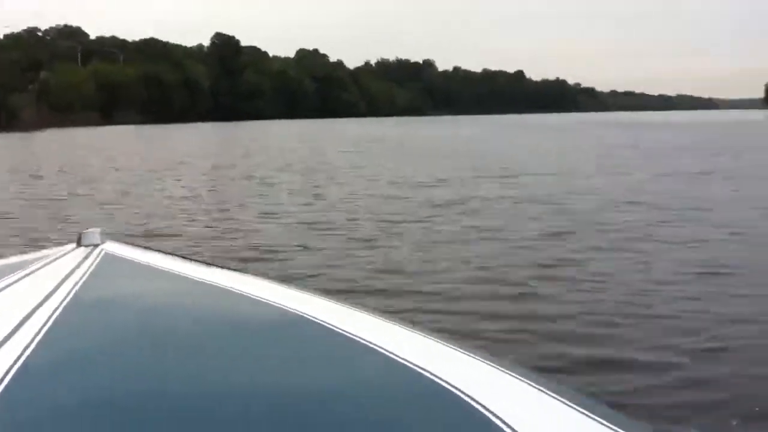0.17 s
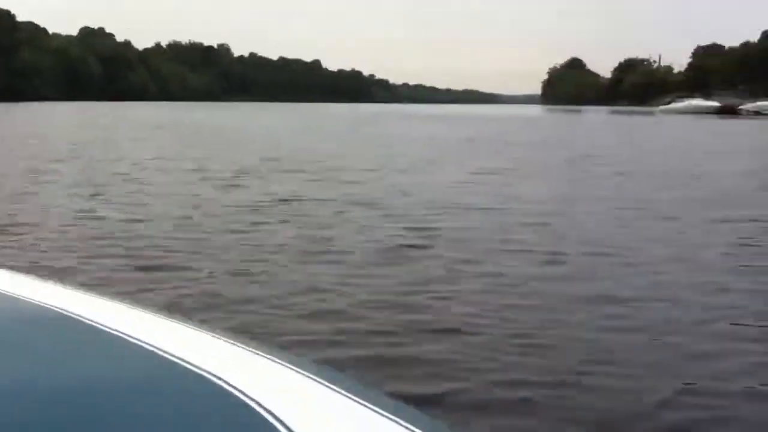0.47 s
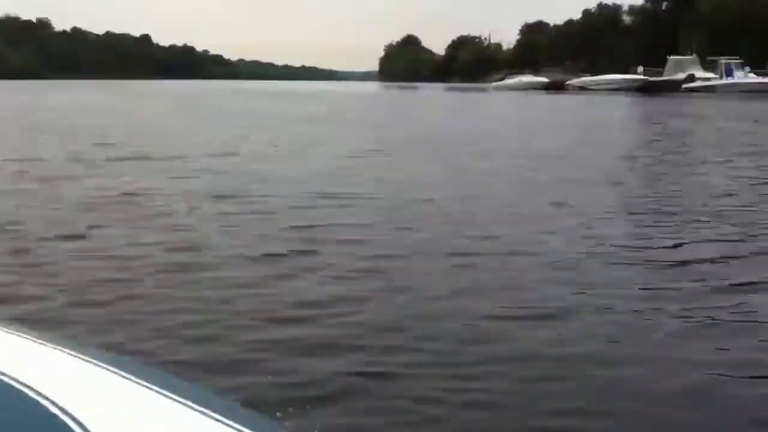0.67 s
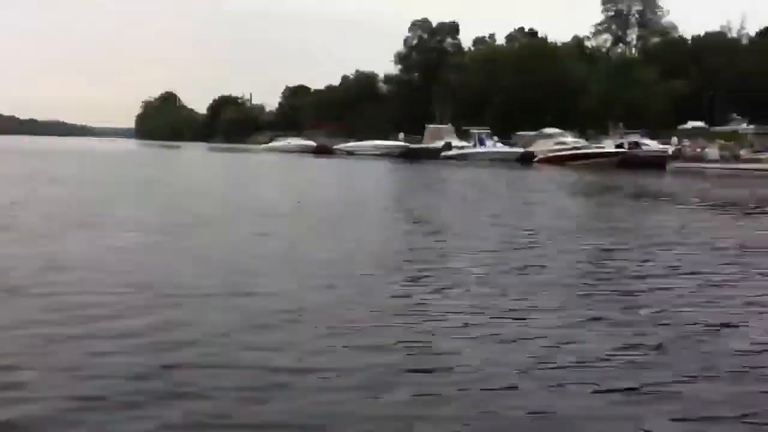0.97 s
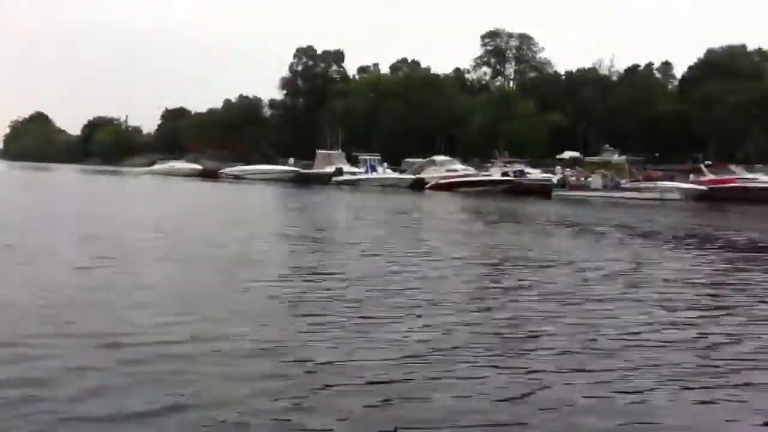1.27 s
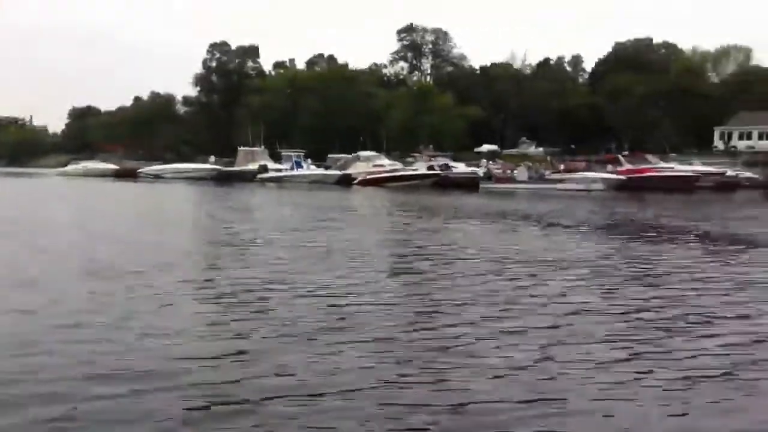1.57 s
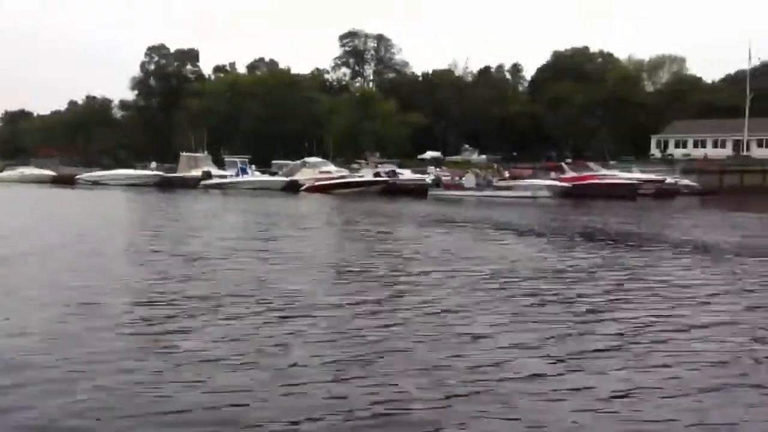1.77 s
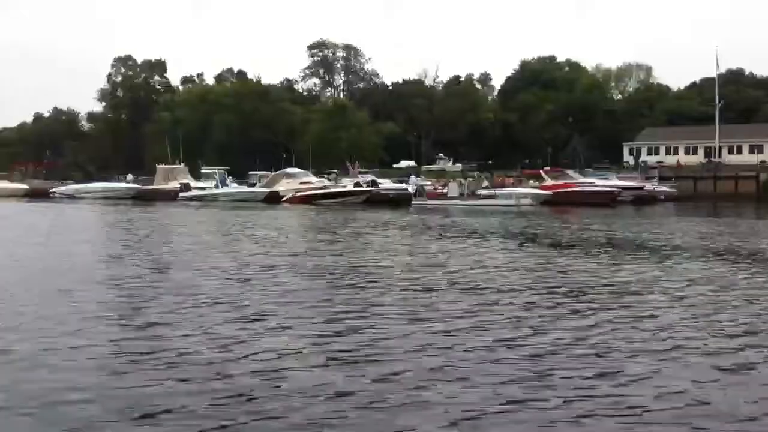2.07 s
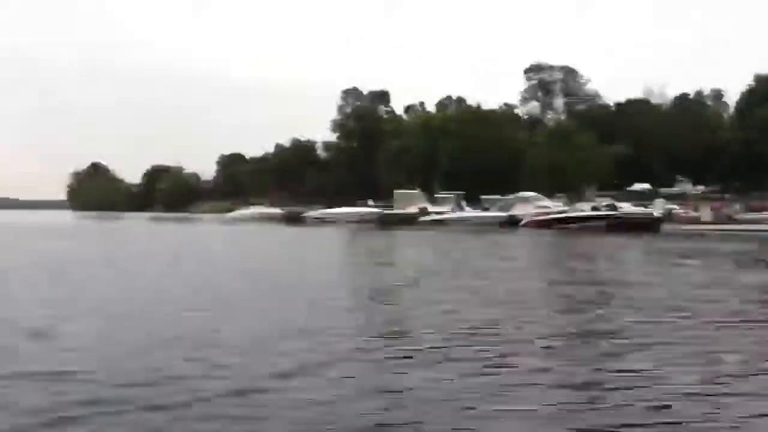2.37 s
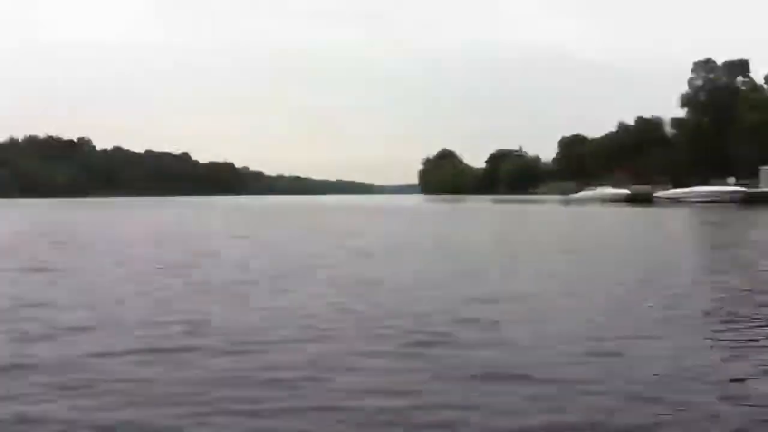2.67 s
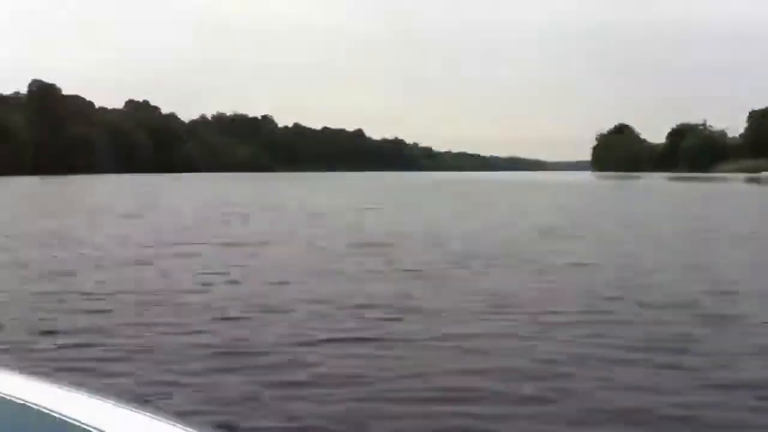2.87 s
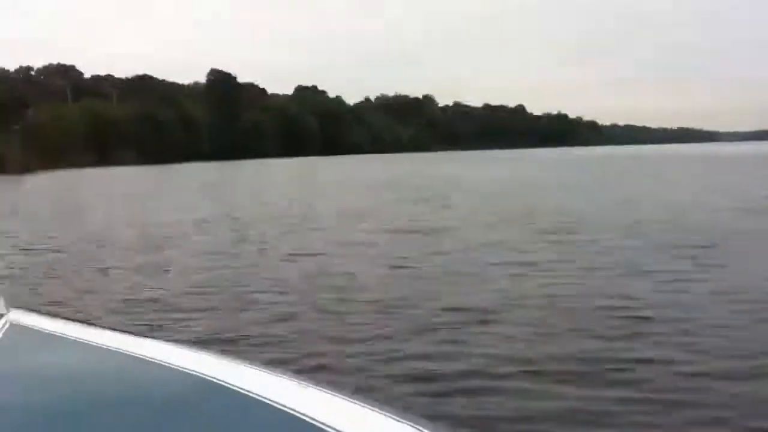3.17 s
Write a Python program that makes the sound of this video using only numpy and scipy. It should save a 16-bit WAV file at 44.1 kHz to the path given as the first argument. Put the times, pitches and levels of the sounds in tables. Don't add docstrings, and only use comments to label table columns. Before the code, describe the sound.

A boat's inboard engine drones low and settles to a lumpy idle as wind thumps the microphone.

```python
import sys
import numpy as np
from scipy import signal
from scipy.fft import rfft, irfft, next_fast_len
from scipy.io import wavfile
from scipy.ndimage import uniform_filter1d, map_coordinates

SR = 44100
rng = np.random.default_rng(int(sys.argv[2]) if len(sys.argv) > 2 else 0)


def ratio(d):
    e = np.asarray(d, float) / 20
    return 10 ** e


def persist_wave(psi):
    counts = np.round(np.clip(psi, -1, 1) * 32767).astype(np.int16)
    wavfile.write(sys.argv[1], SR, np.atleast_2d(counts).T)


N = 146853


def unit(x):
    return x / np.sqrt(np.mean(x ** 2) + 1e-20)


def curve(rows):
    s, value = np.transpose(rows)
    return np.interp(np.arange(N) / SR, s, value)


def wobble(rate):
    knots = rng.standard_normal(int(N * rate / SR) + 4)
    return map_coordinates(knots, [np.arange(N) * rate / SR])


def coloured(x, spectrum):
    m = next_fast_len(N + 8192)
    f, db = np.transpose(spectrum)
    log_hz = np.log(np.fft.rfftfreq(m, 1 / SR) + 1)
    gain = ratio(np.interp(log_hz, np.log(f + 1), db, left=-120, right=-120))
    return irfft(rfft(x, m) * gain, m)[:N]


def rush(spectrum, patchy_db):
    z = signal.stft(rng.standard_normal(N + 512), nperseg=512)[2]
    field = uniform_filter1d(rng.standard_normal(z.shape), size=6, axis=0)
    field = uniform_filter1d(field, size=10, axis=1)
    patchy = signal.istft(z * ratio(patchy_db * unit(field)), nperseg=512)[1][:N]
    return unit(coloured(patchy, spectrum))


def bursts(events, t60, spectrum):
    t, shape = np.arange(SR // 10) / SR, np.zeros(N + SR)
    for s, db in events:
        onset = 1 - np.exp(-30 * t / t60)
        shape[round(s * SR):][:len(t)] += ratio(db - 60 * t / t60) * onset
    noise = rng.standard_normal(N)
    return coloured(shape[:N] * noise, spectrum) / coloured(noise, spectrum).std()


def engine():
    # (time [s], rate [cycles/s])
    speed = [(0.0, 14.4), (0.25, 14.39), (0.42, 14.45), (0.52, 13.77), (0.62, 13.04), (0.75, 12.48),
             (0.9, 12.02), (1.05, 11.84), (1.3, 11.75), (1.7, 11.7), (2.1, 11.79), (2.5, 11.89),
             (2.9, 11.85), (3.33, 12.01)]
    # (multiple of the cycle rate [1], fast-idle level [dB], slow-idle level [dB])
    orders = [(6, -42, -48), (7, -38, -48), (8, -31, -33), (9, -62, -45), (10, -35.5, -45), (11, -35, -56),
              (12, -32, -35), (13, -40, -39), (14, -38, -34.5), (15, -42, -50), (16, -31, -26),
              (17, -49, -33.5), (18, -34, -36.5), (19, -65, -46.5), (20, -44, -46), (21, -38.5, -41.5),
              (22, -37, -41.5), (24, -41.5, -50), (25, -55, -42), (26, -52, -42), (27, -50, -58.5),
              (29, -72, -38.5), (30, -64, -48.5), (32, -66, -53.5), (34, -48.5, -43.5), (35, -73, -49),
              (36, -66, -39)]
    # (frequency [Hz], width [Hz], lift [dB])
    hull = [
        (193.2, 27.3, 8),
        (236.8, 20, 5.5),
    ]
    # (time [s], share of full depth [1])
    miss_grows = [
        (0, 0),
        (1, .35),
        (2.2, .6),
        (2.9, 1),
    ]
    # (frequency [Hz], level per Hz [dB])
    chuff = [(150, -2), (250, -3.5), (421, -22), (551, -12.5), (927, -8.5), (2500, -21.5), (3250, -37),
             (5500, -120)]
    fast_hz, slow_hz = 14.2, 12.1
    uneven_db, slip_rad = 1.0, .08
    spread_rad = 1.0
    miss_turn, miss_depth, miss_sharp = .52, .78, 5
    chuff_db, chuff_depth = -36, .25

    rate = curve(speed)
    turns = .374 + np.cumsum(rate) / SR
    slow = np.clip((fast_hz - rate) / (fast_hz - slow_hz), 0, 1)
    hum = np.zeros(N)
    for k, fast_db, slow_db in orders:
        k = round(k)
        lag = spread_rad * (k - 16) * (k - 17)
        hull_db = sum(db / (1 + (2 * (k * rate - hz) / width) ** 2) for hz, width, db in hull)
        level = ratio(hull_db + fast_db + (slow_db - fast_db) * slow + uneven_db * wobble(6))
        phase = 2 * np.pi * k * turns - lag + slip_rad * wobble(9)
        hum += np.sqrt(2) * level * np.cos(phase)
    dip = np.exp(miss_sharp * (np.cos(np.pi * (turns - miss_turn)) - 1))
    miss = curve(miss_grows) * miss_depth * dip
    firing = np.cos(2 * np.pi * 8 * turns)
    exhaust = ratio(chuff_db) * (1 + chuff_depth * firing) * rush(chuff, patchy_db=1.5)
    return (1 - miss) * hum + exhaust


def water():
    # (time [s], level [dB])
    flow = [(0.0, -45), (0.01, -48), (0.39, -46), (0.41, -48.5), (0.68, -45.5), (0.72, -49), (1.12, -46),
            (1.35, -47.5), (2.21, -45), (3.33, -50)]
    # (frequency [Hz], level per Hz [dB])
    wash_spectrum = [(180, -32), (300, -3), (366, -10), (417, -8), (716, -14), (932, -14), (1310, -20.5),
                     (2570, -22), (7000, -41.5), (9100, -51), (15400, -120)]
    # (frequency [Hz], level per Hz [dB])
    fizz_spectrum = [(2940, -5), (5000, -2), (7120, -6.5), (12100, -4.5), (15100, -8.5), (15900, -19)]
    wash_db, wash_grows = -33, 0.66
    fizz_db, fizz_grows = -49.5, 0.66
    spray_db = -53

    flow_db = curve(flow) - curve(flow).mean()
    shared_db = .75 * wobble(12)
    wash_level = ratio(wash_db + wash_grows * flow_db + shared_db)
    wash = wash_level * rush(wash_spectrum, patchy_db=1.38)
    fizz_level = ratio(fizz_db + fizz_grows * flow_db + shared_db + 0.3 * wobble(2.56))
    fizz = fizz_level * rush(fizz_spectrum, patchy_db=2.0)
    drops = ratio(spray_db + flow_db + 1.8 * wobble(7.4)) * spray(count=6000)
    return wash + fizz + sheets() + drops


def spray(count):
    centre_hz, ring_cycles, tail_db = 6880, 2.5, 3
    pitch, t = rng.standard_normal((count, 2)), np.arange(96) / SR
    hz = np.clip(centre_hz * np.exp(.5 * pitch[:, :1]), 1500, 15000)
    size = ratio(tail_db * np.minimum(rng.exponential(size=(count, 1)), 4))
    grain = size * np.sin(2 * np.pi * hz * t) * np.exp(-t * hz / ring_cycles)
    at = rng.integers(0, N, (count, 1)) + np.arange(96)
    return unit(np.bincount(at.ravel(), grain.ravel(), N + 96)[:N])


def sheets():
    # (time [s], half length [s], level [dB], centre frequency [Hz])
    falls = [
        (.25, 0.23, -55.5, 12500),
        (.63, .05, -56, 6000),
        (2.05, 0.51, -57.5, 8200),
        (2.103, 0.38, -52.5, 4300),
        (3.267, 0.083, -53.5, 8600),
    ]
    edge = 1 + 2 * 0.19
    t, out = np.arange(N) / SR, np.zeros(N)
    for s, half, db, hz in falls:
        band = [(hz / edge, -20), (hz, .1), (hz * edge, -20)]
        swell = np.exp(-.5 * ((t - s) / half) ** 2)
        out += ratio(db) * swell * rush(band, patchy_db=1.3)
    return out


def wind():
    # (time [s], level [dB])
    gusts = [(0, -34), (.6, -32.5), (1.0, -36.5), (1.16, -24), (1.27, -29.5), (1.38, -26), (1.53, -26),
             (1.6, -24.5), (1.8, -31), (1.9, -33), (2.02, -21), (2.15, -29), (2.43, -29.5), (2.53, -18.5),
             (2.59, -29.5), (2.68, -22), (2.76, -31), (3.25, -37)]
    # (frequency [Hz], level per Hz [dB])
    buffet_spectrum = [(60, -11), (85, -13), (125, 0.3), (160, -0.5), (240, -0.5), (330, -6), (500, -13),
                       (1200, -39.5)]
    calm_db, gust_grows, buffet_db = -36, 1.2, 2
    gust_db = calm_db + gust_grows * (curve(gusts) - calm_db)
    lumps = ratio(3.2 * wobble(45))
    buffet = ratio(gust_db + buffet_db) * unit(lumps * rush(buffet_spectrum, patchy_db=1.0))
    return buffet + thumps()


def ticks():
    # (time [s], peak level [dB])
    contacts = [
        (.7935, -33),
        (.811, -29),
        (.8228, -26),
        (2.892, -29),
        (3.064, -16.5),
        (3.14, -31),
        (3.18, -34),
    ]
    # (frequency [Hz], level [dB])
    tick_spectrum = [(700, -30), (1800, 0), (4500, -20), (7500, -9), (10000, 2), (13000, .1), (16000, -8)]
    # (frequency [Hz], level [dB], t60 [s])
    case = [
        (1900, -6, .008),
        (3300, -8, .005),
        (5200, -11, .003),
    ]
    snap_db, crackle_db, crackle_t60 = 10, -6, .003
    blows, t = np.zeros(N), np.arange(SR // 20) / SR
    for s, db in contacts:
        blows[round(s * SR) + 8] = ratio(db)
    edge = ratio(snap_db) * coloured(blows, tick_spectrum)
    crackle = ratio(crackle_db) * bursts(contacts, crackle_t60, tick_spectrum)
    ring = sum(ratio(db - 60 * t / t60) * np.sin(2 * np.pi * hz * t) for hz, db, t60 in case)
    return edge + crackle + signal.fftconvolve(blows, ring)[:N]


def thumps():
    # (time [s], peak level [dB], pitch [Hz])
    eddies = [(1.108, -25, 291), (1.165, -12, 240), (1.243, -20, 264), (1.299, -17, 250), (1.369, -13, 308),
              (1.467, -15.5, 248), (1.584, -19.5, 242), (1.767, -16, 244), (1.899, -18, 334),
              (1.92, -22, 242), (1.985, -5, 242), (2.176, -25, 269), (2.32, -26, 242), (2.346, -28, 280),
              (2.395, -18, 242), (2.474, -20, 285), (2.517, -6.5, 264), (2.597, -10.5, 276),
              (2.637, -16, 240), (2.665, -6.5, 305), (2.739, -10.5, 238), (2.81, -10.5, 334)]
    # (frequency [Hz], level per Hz [dB])
    puff_spectrum = [(70, -30), (150, -5), (260, -5), (450, -2), (800, -5), (1600, -5)]
    push_db, push_cycles = -3, 0.7
    puff_db, puff_t60 = -15, 0.036
    out, t = np.zeros(N + SR), np.arange(SR // 20) / SR
    for s, db, hz in eddies:
        u = t * hz / push_cycles
        push = np.e * u * np.exp(-u)
        out[round(s * SR):][:len(t)] += ratio(db + push_db) * push * np.sin(2 * np.pi * hz * t)
    puffs = bursts([row[:2] for row in eddies], puff_t60, puff_spectrum)
    return out[:N] + ratio(puff_db) * puffs


def scene():
    return (engine() + water() + wind() + ticks())[None]


def band_limit(x):
    return signal.sosfilt(signal.butter(12, 16490, fs=SR, output="sos"), x)


def record(dry):
    mic_cut_hz, top_hz = 85.6, 15850
    rumble_db, rumble_top_hz = -57.5, 110
    m = next_fast_len(N + 8192)
    hz = np.fft.rfftfreq(m, 1 / SR)
    passed = (hz < top_hz) / np.sqrt(1 + (mic_cut_hz / (hz + 1)) ** 8)
    heard = irfft(rfft(dry, m) * passed, m)[:, :N]
    rumble = ratio(rumble_db) * rush([(15, -3), (40, .1), (rumble_top_hz, 3)], patchy_db=1.0)
    return band_limit(heard + rumble)


dry = scene()
out = record(dry)
persist_wave(out)
```